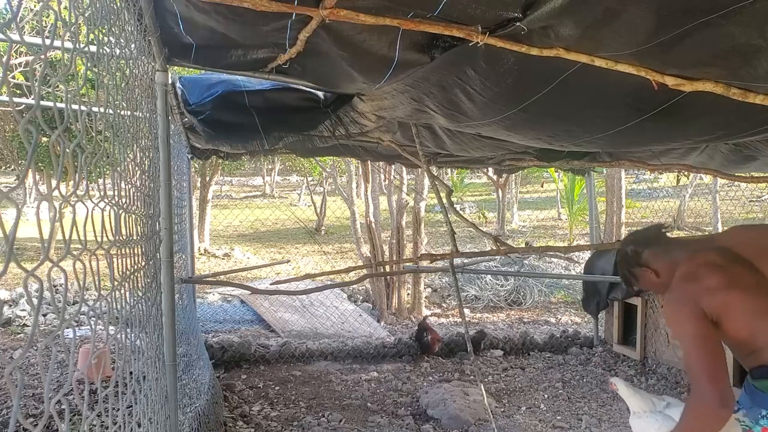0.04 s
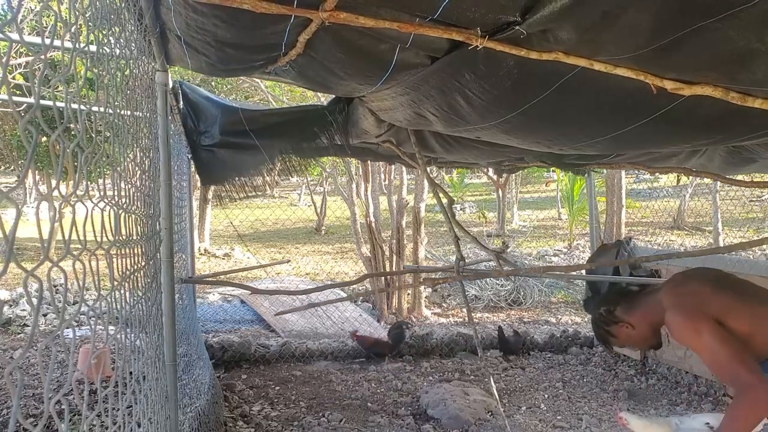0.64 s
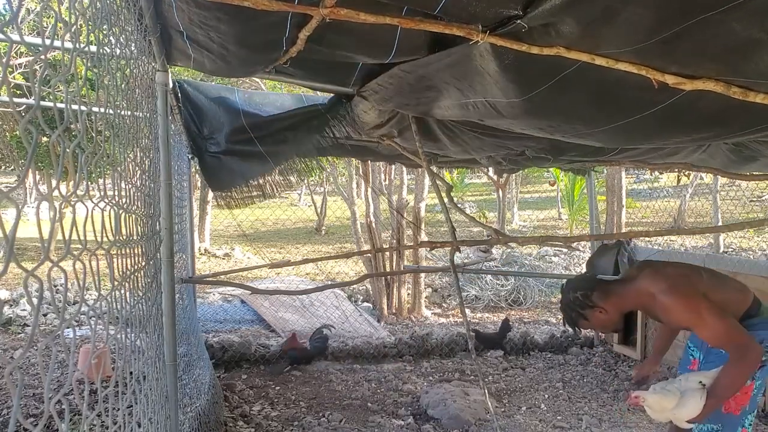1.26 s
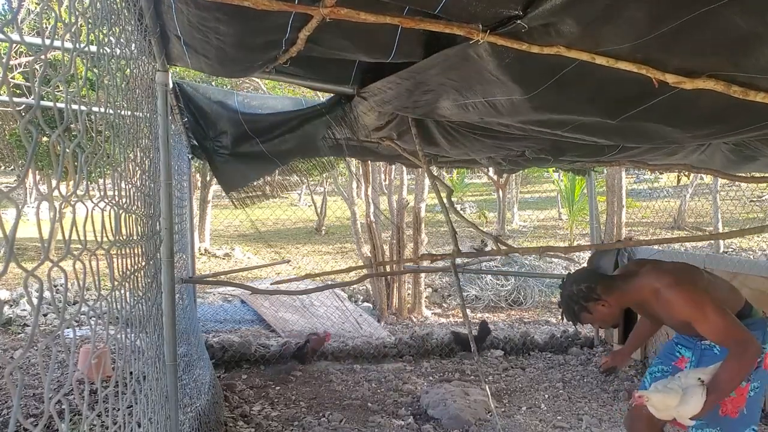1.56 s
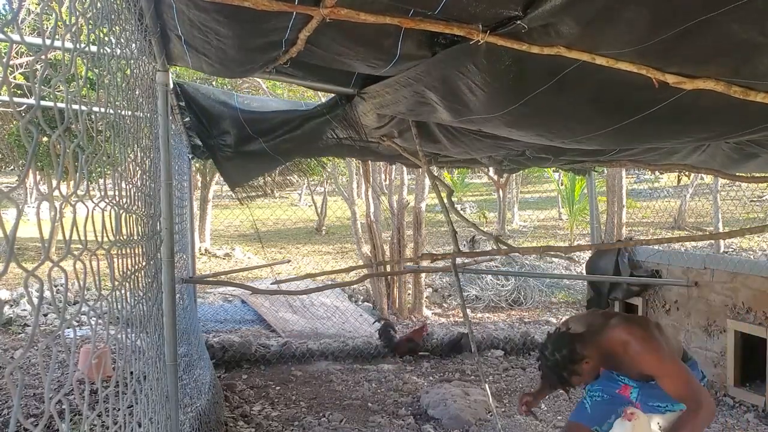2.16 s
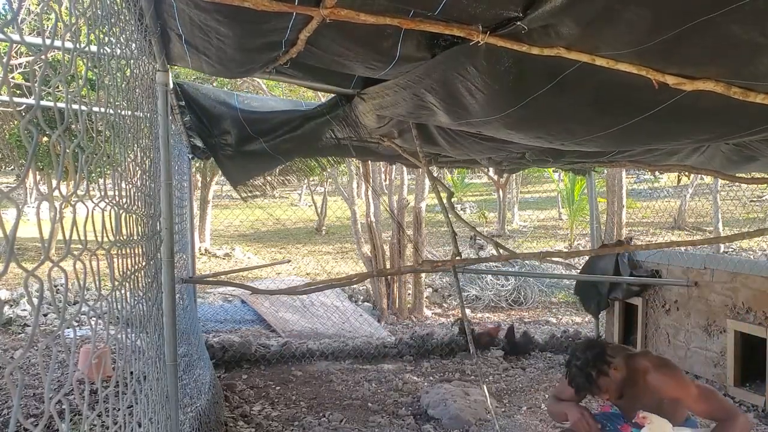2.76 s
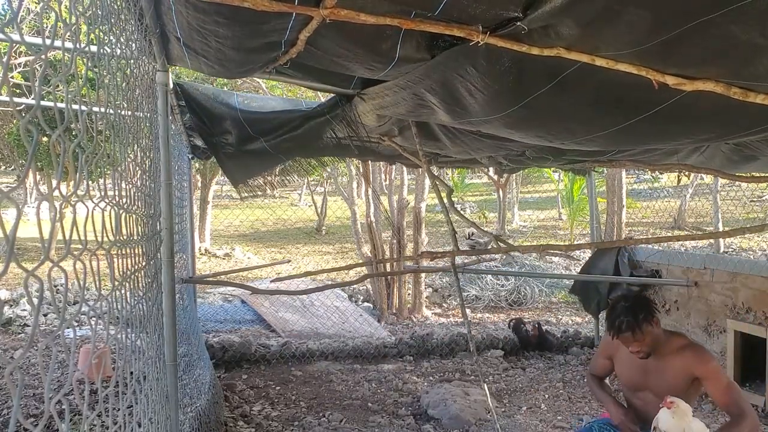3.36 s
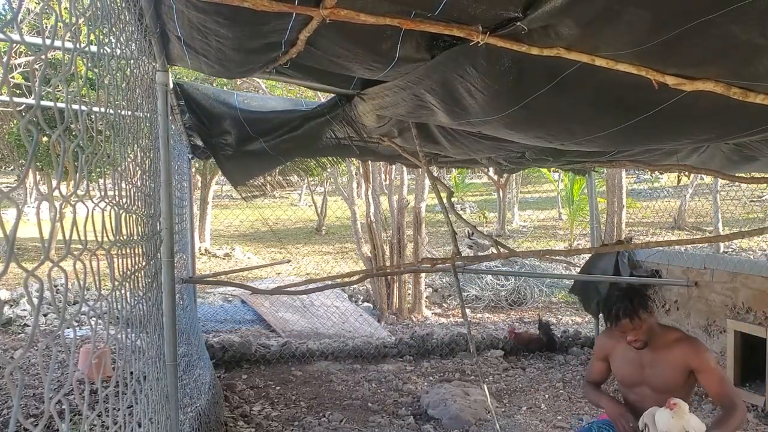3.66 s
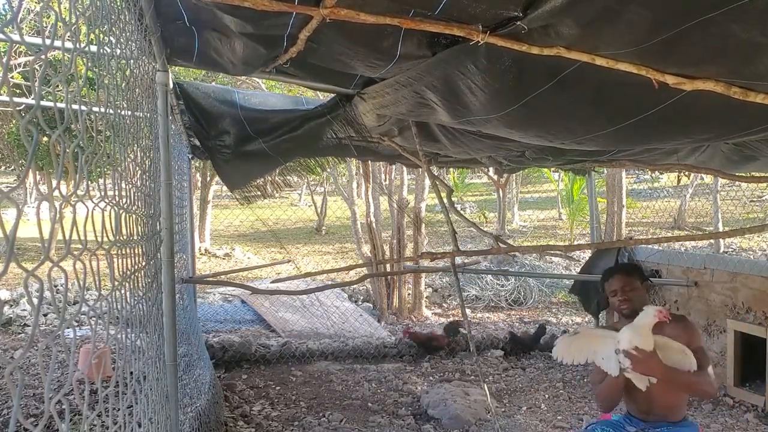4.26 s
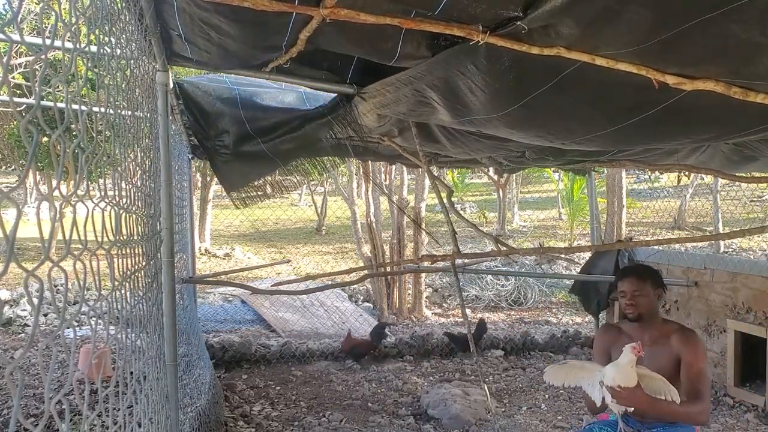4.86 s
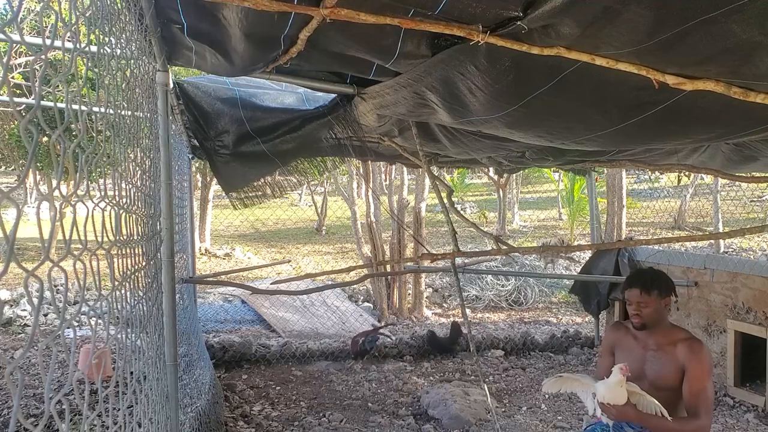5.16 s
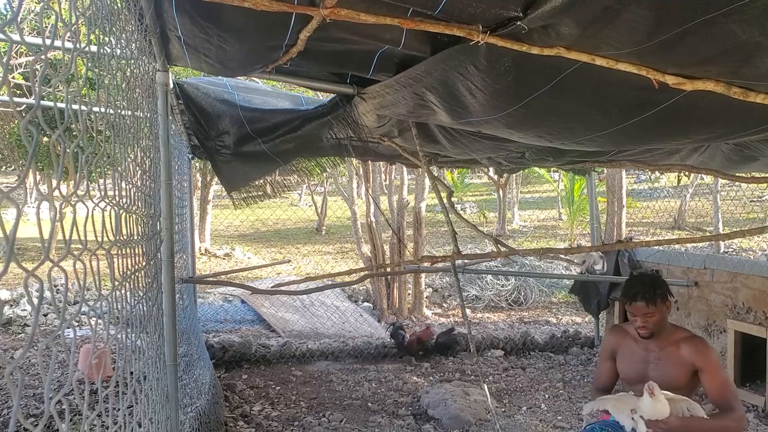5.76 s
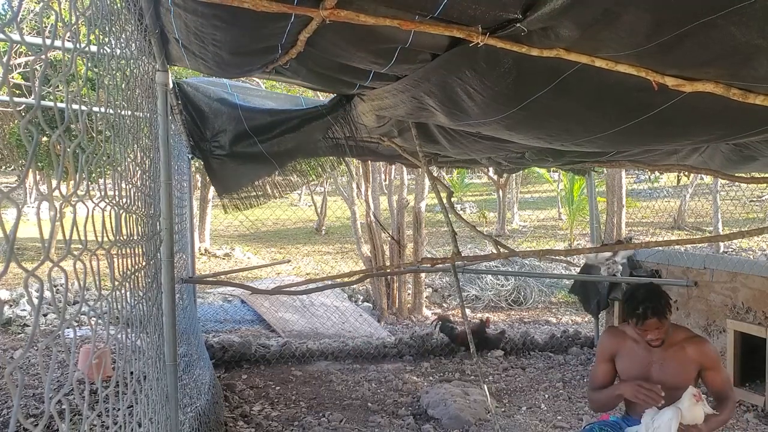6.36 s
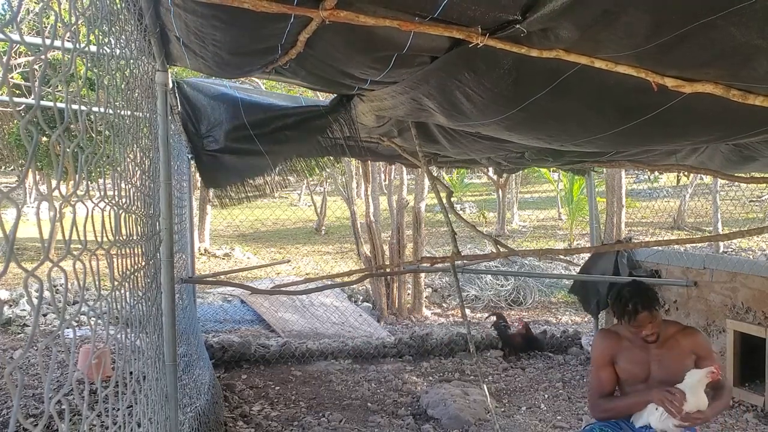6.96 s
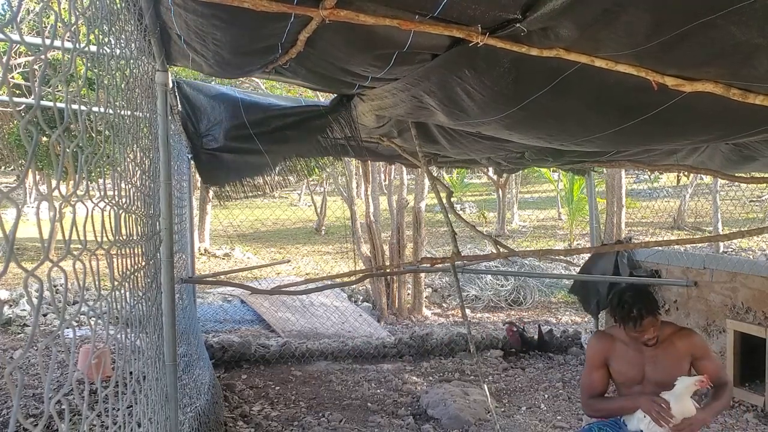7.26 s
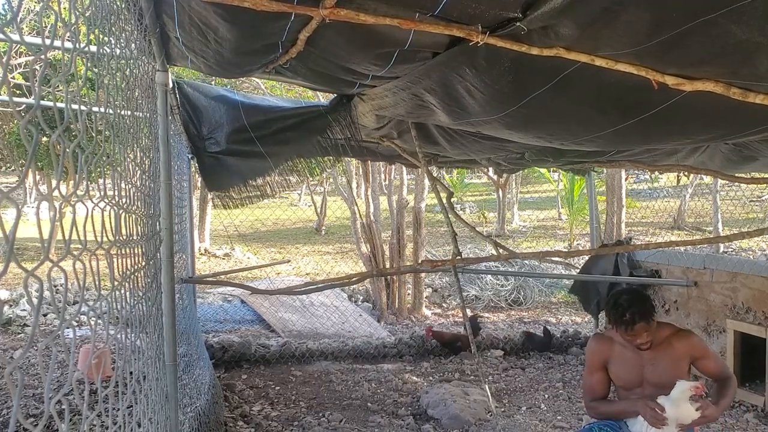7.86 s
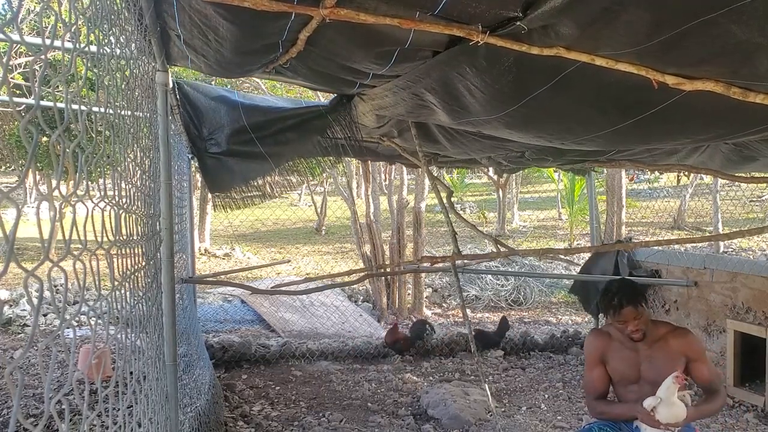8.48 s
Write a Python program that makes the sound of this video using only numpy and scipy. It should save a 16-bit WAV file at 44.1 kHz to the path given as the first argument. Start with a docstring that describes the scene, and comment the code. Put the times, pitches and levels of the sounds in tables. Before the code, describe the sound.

A hen squawks repeatedly in an outdoor pen, close to the microphone and slightly to the right. Most cries last about half a second, swelling from a rasp, sometimes clearing into a tone, then breaking into a lower croak. They come at about 0.3, 1.5, 2.9, 3.7, 4.4, 5.4, 6.5 and 7.3 seconds. Those at 3.7, 5.4 and 6.5 crack upward and are shriller, with 5.4 the loudest. Short hoarse clucks fall between them. At 8 seconds quick clucks lead into an abrupt high squawk and a softer, lower one.

Wind and handling rumble on the microphone during the first second, then stay low, with a few soft bumps from 4 seconds on. A distant rooster crows faintly from about 2 to 4.4 seconds. Scattered dry ticks of grit and feathers occur mostly in the first half. A quiet, steady rustle of leaves and open air continues throughout.

```python
"""A hen, held in the hand under a tarpaulin roof, squawks again and again, with short clucks in between.
Membranes in her syrinx chop the breath into pulses, which the resonances of throat and beak shape.
Each cry starts hoarse, may clear into a tone, and drops to a half-pitch croak by period doubling.
A rooster crows far off, grit and feathers tick, and the yard rustles. Handling and wind rumble on
a phone whose two microphone ports hear the hen from the right."""
import sys
import numpy as np
from scipy import signal
from scipy.fft import rfft, irfft, next_fast_len
from scipy.io import wavfile
from scipy.ndimage import uniform_filter1d

SR = 44100
rng = np.random.default_rng(int(sys.argv[2]) if len(sys.argv) > 2 else 0)


def store_wav(level_fs):
    """Save 16-bit WAV to argv[1]."""
    pcm = np.round(np.clip(np.atleast_2d(level_fs), -1, 1) * 32767)
    wavfile.write(sys.argv[1], SR, pcm.T.astype(np.int16))


N = 380141
TIME = np.arange(N) / SR
TOP_HZ = 15850


def undb(db):
    """Decibels to amplitude ratio."""
    return 10 ** (np.asarray(db) / 20)


def unit(x):
    """Normalise to rms 1."""
    return x / np.sqrt(np.mean(x ** 2))


def steady(x, size=420):
    """Flatten the envelope: divide by the running rms."""
    return x / np.sqrt(np.abs(uniform_filter1d(x ** 2, size)) + 1e-12)


def filtered(x, response):
    """Linear filtering: multiply the spectrum by a function of frequency."""
    size = next_fast_len(x.shape[-1] + 2048)
    hz = np.arange(size // 2 + 1) * SR / size + 1e-3
    return irfft(rfft(x, size) * response(hz), size)[..., :x.shape[-1]]


def coloured(x, points):
    """Spectral shaping through (frequency_hz, gain_db) points, normalised to rms 1."""
    hz, db = np.transpose(points)
    return unit(filtered(x, lambda f: undb(np.interp(np.log(f), np.log(hz), db))))


def flutter(count, hz):
    """Low-pass noise of rms 1, rolling off above hz."""
    return unit(filtered(rng.standard_normal(count), lambda f: 1 / (1 + (f / hz) ** 2)))


def wobble(count, hz):
    """Random modulation: hz values a second, joined by straight lines."""
    return np.interp(np.arange(count) * hz / SR, np.arange(512), rng.standard_normal(512))


def curve(points, at):
    """Linear interpolation in a two-column table."""
    return np.interp(at, *np.transpose(points))


def add(track, start_s, x):
    """Superposition: mix x into the track with tapered ends."""
    i = int(start_s * SR)
    track[i:i + len(x)] += (x * signal.windows.tukey(len(x), .02))[:N - i]


def rumble(shared=0.48, gain_db=0.5, buffet_db=3):
    """Partly coherent noise: fingers and gusts buffet the phone, and each port feels a part alone."""
    # strength of handling and wind, hard at first: time_s, level_db
    strength = [(0, -50), (.19, -37), (.26, -37.5), (.48, -28.5), (.65, -42.5), (.76, -37.5), (.86, -57),
                (1.3, -65.5), (1.75, -53.5), (2.6, -62), (3.2, -53.5), (4.4, -58.5), (5.6, -54), (6.3, -61),
                (7.8, -52), (8.6, -54)]
    # spectrum of the shaking: frequency_hz, gain_db
    spectrum = [(12, -46), (20, -11), (54, -3), (70, 1), (122, -9), (156, -13.5), (268, -26), (400, -30.5),
                (520, -20.5), (880, -120)]
    shaking = coloured(shared * rng.standard_normal(N) + rng.standard_normal((2, N)), spectrum)
    balance_db = np.array([[-.5], [2.8]])
    return shaking * undb(curve(strength, TIME) + gain_db + buffet_db * wobble(N, hz=21.2) + balance_db)


def yard(level_db=-55):
    """A diffuse field of leaves and open air: coherent at the two ports in the bass, not in the treble."""
    # spectrum of the background: frequency_hz, gain_db
    spectrum = [(88, -58), (150, -2.5), (186, -7), (269, -3), (474, -3), (522, -2.5), (974, -11.5),
                (2170, -14), (2340, -11.5), (3020, -10.5), (3390, -15), (11800, -15), (15800, -17)]
    common = filtered(rng.standard_normal(N), lambda f: 2 / (1 + (f / 1200) ** 2) ** .5)
    apart = filtered(rng.standard_normal((2, N)), lambda f: 2 / (1 + (900 / f) ** 2) ** .5)
    sway_db = .7 * flutter(N, hz=3)
    balance_db = np.array([[-.8], [.8]])
    return coloured(common + apart, spectrum) * undb(level_db + sway_db + balance_db)


def ticks(gain_db=-4, attack_s=.001, decay_s=.007):
    """Broadband transients: grit and stiff feathers give a dry crack with a little body."""
    # small impacts: start_s, level_db, body_db
    impacts = [(0.074, -37, -3), (1.1543, -44, -8), (1.2495, -41.5, -10), (2.0615, -36, 2),
               (2.4036, -39, -17), (2.643, -56, -13), (3.3298, -42, -2), (3.4462, -35, 0),
               (3.592, -42, -26), (3.675, -34, -9), (4.4816, -36, 0), (7.3305, -40.5, -16)]
    out, t = np.zeros(N), TIME[:4000]
    envelope = np.exp(-t / decay_s) * np.minimum(t / attack_s, 1)
    for start_s, level_db, body_db in impacts:
        noise = rng.standard_normal((2, len(t)))
        crack = coloured(noise[0], [(2000, 18), (6000, 5), (12000, 18.5), (16000, 2)])
        body = coloured(noise[1], [(200, 34), (900, -15), (3500, -13), (7000, -16)])
        add(out, start_s, undb(level_db + gain_db) * (crack + undb(body_db - 11) * body) * envelope)
    return out


def hoarseness(t, length_s, clear_s, break_s, tone_rough, tone_alternation, croak_rough):
    """Vibration regimes of a cry: irregular onset, periodic tone, then a period-doubled croak."""
    onset_rough, hoarse_rough, end_rough, croak_alternation = 0.804, .47, .54, 0.97
    clearing_s, breaking_s = 0.031, 0.0074
    stages = [(0, onset_rough), (max(clear_s - clearing_s, 0), hoarse_rough), (clear_s, tone_rough)]
    croak = (1 + np.tanh(2 * (t - break_s) / breaking_s)) / 2
    progress = np.clip((t - break_s) / (length_s - break_s), 0, 1)
    fraying = croak_rough + (end_rough - croak_rough) * progress ** 2
    rough = (1 - croak) * curve(stages, t) + croak * fraying
    alternation = tone_alternation + (croak_alternation - tone_alternation) * croak
    return np.maximum(rough, 0), alternation, croak


def syrinx(hz, rough, alternation, jitter=0.96, shimmer=0.99, wander=0.01596, uneven_db=5, hiss=.18):
    """A pulse source: membranes slap shut once a cycle; strain adds jitter, shimmer and rushing air."""
    n = len(hz)
    cycle = 2 * np.pi * np.cumsum(hz * (1 + wander * (0.211 + rough) * flutter(n, hz=51.7))) / SR
    phase = cycle + jitter * rough ** 2.33 * flutter(n, hz=170)
    slaps = np.zeros(n)
    for k in range(1, 29):  # the upper harmonics lag, and each swells and fades by itself
        gain = undb(uneven_db * min(k / 7, 1) ** 2 * wobble(n, hz=16))
        slaps += gain * np.cos(k * phase - .12 * k * k) * (k * hz < TOP_HZ)
    half_pitch = 1.31 * alternation * np.cos(cycle / 2 + .5)  # strong and weak cycles take turns
    strength = 1 + half_pitch + shimmer * rough * flutter(n, hz=189)
    air = (1 + 0.68 * np.cos(phase)) * rng.standard_normal(n)
    return unit(slaps * strength) + rough ** 2 * air + hiss * np.gradient(air)


def resonance(x, hz, width_hz):
    """A damped resonator whose centre frequency may move."""
    turn = np.exp(2j * np.pi * np.cumsum(hz * np.ones(len(x))) / SR)
    pole = np.exp(-np.pi * width_hz / SR)
    return np.real(turn * signal.lfilter([1 - pole], [1, -pole], x / turn))


def vocal_tract(source, level_db, chest_db, edge_db, treble_db, beak_hz, upper_hz):
    """Source and filter: throat and beak impose formants, then four bands each take their own level."""
    # fixed throat resonances: centre_hz, nominal_width_hz, gain_db
    formants = [(283, 170, -13), (610, 340, -11.5), (1214, 375, 1.5), (1777, 284, 1), (2710, 528, 8),
                (3550, 564, 3), (4317, 400, 0), (5250, 890, -15.5), (6774, 660, -13), (8950, 1620, -15.5),
                (11890, 2000, -17.5), (16200, 500, -16)]
    throat = filtered(source, lambda f: sum(
        (-1) ** k * undb(db) / (1 + 1j * (f / hz - hz / f) * hz / (1.43 * width)) ** 2
        for k, (hz, width, db) in enumerate(formants)))
    beak = resonance(throat, beak_hz, width_hz=240)
    upper = resonance(throat, upper_hz, width_hz=690)
    voice = throat + 4 * beak + 5 * upper
    chest, body, edge, treble = (
        steady(filtered(voice, lambda f: 1 / (1 + (f / high_hz) ** 24) / (1 + (low_hz / f) ** 24)))
        for low_hz, high_hz in [(200, 920), (920, 2300), (2300, 4900), (4900, TOP_HZ)])
    return undb(level_db) * (undb(chest_db + 1.5) * chest + undb(2) * body
                             + undb(edge_db + 5) * edge + undb(treble_db + 2) * treble)


def squawks(crack_s=0.014, crack_rough=0.26, tremble_db=4):
    """Formant shift: the opening beak lifts its resonance and brightens each swelling, trembling cry."""
    # the hen's cries (clear_s, break_s and widest_s count from start_s; roughness and alternation 0-1):
    # start_s, length_s, clear_s, break_s, widest_s, level_db, swell_s, tone_rough, tone_alternation,
    # croak_rough, croak_db, chest_db, edge_db, treble_db, open_hz, upper_hz
    cries = [ (0.249, .56, .29, .46, 0.36, -27.5, 0.097, .2, .05, 0.62, -2.5, -12.5, -10.5, -20, 1650, 3460),
             (1.53, 0.49, 0.3, 0.43, 0.35, -29, 0.11, 0.52, 0.1, 0.54, 1, -12, -7.5, -15.5, 1460, 3550),
             (2.875, .36, 0.032, 0.059, 0.26, -31, 0.08, 0.54, 0.43, 0.54, -0.5, -8, -5, -15.5, 1310, 3750),
             (3.692, 0.49, 0.28, 0.36, 0.34, -28.5, 0.1, 0.08, 0, 0.27, 8, -10.5, 1, -5.5, 1790, 3730),
             (4.416, 0.32, 0.14, 0.27, 0.21, -35.5, 0.067, 0.11, 0, 0.75, 3, -6.5, -8, -12, 1200, 3800),
             (5.438, 0.6, 0.14, 0.44, 0.35, -24, 0.12, 0.06, 0.06, 0.33, -2.5, -14, -4, -10.5, 1820, 3440),
             (6.545, 0.4493, 0.207, 0.3, 0.22, -30, 0.067, 0.05, 0, 0.47, 5, -10.5, 1, -9, 1470, 3720),
             (7.285, 0.66, 0.31, 0.53, 0.44, -31.5, 0.089, 0.32, 0.19, 0.59, -0.5, -14.5, -6.5, -16.5, 1310, 4010),
             (8.205, 0.24, 0.09, 0.197, 0.081, -25.5, 0.0055, 0.17, 0.18, 0.68, 3.5, -13, 0, -9.5, 1950, 3120),
             (8.405, 0.2, .03, 0.057, 0.025, -36.5, 0.0044, 0.38, 0.36, 0.44, -1, -7.5, -6, -12, 1120, 3260)]
    # one pitch contour for each cry: time_s, pitch_hz
    contours = [
        [(.245, 450.5), (.42, 544), (.52, 580), (.65, 577), (.70, 596.4), (.81, 497.5)],
        [(1.53, 474.4), (1.62, 528), (1.7, 523), (1.78, 549.3), (1.91, 560.4), (1.975, 492.6), (2.025, 465)],
        [(2.88, 461.4), (3.0, 542.6), (3.1, 502), (3.16, 498), (3.235, 428)],
        [(3.7, 560.6), (3.86, 557.6), (3.905, 776.6), (3.94, 783), (4.0, 703), (4.04, 800), (4.085, 891),
         (4.14, 835), (4.195, 753)],
        [(4.42, 456.2), (4.51, 497.7), (4.6, 501.5), (4.665, 491), (4.74, 435)],
        [(5.44, 509), (5.54, 556.2), (5.7, 606.8), (5.77, 648.8), (5.845, 708), (5.945, 727), (5.97, 832),
         (6.01, 776), (6.06, 683)],
        [(6.55, 523), (6.62, 574.7), (6.67, 736), (6.73, 794), (6.795, 701), (6.86, 840), (6.91, 770),
         (6.93, 833), (6.995, 632.6)],
        [(7.29, 615.6), (7.4, 647), (7.52, 620.7), (7.6, 591.7), (7.68, 595.3), (7.74, 628), (7.81, 643),
         (7.88, 561), (7.94, 542)],
        [(8.2, 797), (8.235, 900), (8.29, 882), (8.32, 844), (8.35, 850), (8.385, 871), (8.41, 912)],
        [(8.41, 562.4), (8.46, 510), (8.49, 561.6), (8.6, 515)],
    ]
    # cracks of the voice between registers: time_s, surge_db, extra_edge_db
    cracks = [(0.501, 1.5, 5), (0.724, 3.5, 1), (3.958, 4.5, 4), (4.052, 8, -1), (5.645, 1, -0.5),
              (5.79, -0.5, 1), (5.852, -2.5, 8.5), (6.714, 5, -1), (7.402, 5.5, 2), (8.25, 1, 0),
              (8.288, 3.5, 0.5), (8.406, 3, 0.5)]
    attack_share, swell_db, release_s, release_db = 0.23, 22, 0.047, 31
    gape_s, shut_hz, closing_s, closing_sag = 0.13, 1285, 0.045, 0.16
    chest_follows = 0.69  # share of the swell that the chest takes part in
    out = np.zeros(N)
    for cry, contour in zip(cries, contours):
        (start_s, length_s, clear_s, break_s, widest_s, level_db, swell_s, tone_rough, tone_alternation,
         croak_rough, croak_db, chest_db, edge_db, treble_db, open_hz, upper_hz) = cry
        t = TIME[:int(length_s * SR)]
        rough, alternation, croak = hoarseness(
            t, length_s, clear_s, break_s, tone_rough, tone_alternation, croak_rough)
        release = np.clip(1 - (length_s - t) / release_s, 0, 1) ** 2
        effort_db = -swell_db * np.exp(-t / swell_s) - release_db * release
        gape = np.exp(-((t - widest_s) / gape_s) ** 2)
        closing = np.exp((t - length_s) / closing_s)
        beak_hz = (shut_hz + (open_hz - shut_hz) * gape) * (1 - closing_sag * closing)
        ring_db = croak_db * croak  # acts only on the body band, where the beak rings
        level_db += effort_db + ring_db + tremble_db * rough * wobble(len(t), hz=54.17)
        # the croak is thinner and duller than the tone
        chest_db -= (1 - chest_follows) * effort_db + 3 * croak + ring_db
        edge_db -= 5 * (1 - gape) + ring_db
        treble_db -= 3.5 * (1 - gape) + 2 * croak + ring_db
        for time_s, surge_db, extra_edge_db in cracks:
            crack = np.exp(-((start_s + t - time_s) / crack_s) ** 2)
            level_db += surge_db * crack
            edge_db += extra_edge_db * crack
            rough += crack_rough * crack
        source = syrinx(curve(contour, start_s + t), rough, alternation)
        voice = vocal_tract(source, level_db, chest_db, edge_db, treble_db, beak_hz, upper_hz)
        add(out, start_s, voice * np.minimum(t / (attack_share * swell_s), 1))
    return out


def clucks(width_s=0.017, arch=.15, opening=0.13, glide=0.0696, gain_db=-1.2):
    """Frequency modulation: pitch and formant of each short, hoarse note arch as the beak opens and shuts."""
    # notes between the cries: peak_s, level_db, edge_db, beak_hz, pitch_hz
    notes = [(0.929, -39, -4.5, 1420, 487), (1.495, -45.5, -10, 1320, 432), (2.209, -45.5, -8.5, 1130, 420),
             (2.444, -31, -13, 1460, 459), (3.667, -46.5, -11, 1130, 411), (5.097, -49, -9, 1280, 435),
             (5.293, -36.5, -7, 1350, 456), (6.215, -36.5, -10, 1150, 491), (6.405, -37, -11, 1150, 476.4),
             (7.213, -43.5, -7.5, 1450, 453), (8.009, -27.5, -7, 1500, 520),
             (8.124, -34.5, -4, 1200, 439.6)]
    out, t = np.zeros(N), np.arange(-1800, 2600) / SR
    swell = 1 / (1 + (t / width_s) ** 4)
    lift = 1 + glide * np.tanh(t / width_s)
    for peak_s, level_db, edge_db, beak_hz, pitch_hz in notes:
        source = syrinx(pitch_hz * lift * (1 + arch * (swell - 1)), rough=0.45, alternation=0.37)
        chest_db = -47 - level_db  # the chest sounds equally in every cluck
        voice = vocal_tract(source, level_db + gain_db, chest_db, edge_db, treble_db=edge_db - 12,
                            beak_hz=beak_hz * lift * (1 + opening * (swell - 1)), upper_hz=3470)
        add(out, peak_s + t[0], swell * voice)
    return out


def rooster(scoop=.11, scoop_s=0.077, fade_db=19):
    """Treble loss over distance: the low harmonics carry, as each note scoops upward and fades."""
    # notes of the crow: start_s, length_s, pitch_hz, level_db
    notes = [(1.979, 0.17, 787, -53), (2.462, 0.13, 715, -61.5), (3.232, 0.26, 781, -56),
             (4.14, 0.21, 850, -64)]
    out = np.zeros(N)
    for start_s, length_s, pitch_hz, level_db in notes:
        t = TIME[:int(length_s * SR)]
        source = syrinx(pitch_hz * (1 - scoop * np.exp(-t / scoop_s)), rough=0.58, alternation=0.15)
        voice = coloured(source, [(400, 6), (780, -0.5), (1600, -1.5), (2300, -6), (3500, -15), (7000, -18)])
        add(out, start_s, undb(level_db + 2 - fade_db * (t / length_s) ** 2) * voice)
    return out


def bumps(ring_s=0.0065):
    """Damped oscillation: a soft knock rocks the phone for a cycle or two."""
    # fingers shifting on the phone: start_s, level_db, ring_hz
    knocks = [(4.085, -40.5, 66), (4.848, -36.5, 79.8), (5.128, -36.5, 73), (6.737, -42, 153),
              (7.747, -40.5, 81), (8.595, -38, 75)]
    out, t = np.zeros(N), TIME[:5000]
    envelope = (t / ring_s) * np.exp(1 - t / ring_s)
    for start_s, level_db, ring_hz in knocks:
        add(out, start_s, undb(level_db) * envelope * np.sin(2 * np.pi * ring_hz * t))
    return out


def reflection(x, delay_s, drift_s=0.0002593, step_s=.01):
    """A varying delay: the reflected path changes as the bird and the phone move."""
    steps = np.arange(0, TIME[-1] + 1, step_s)
    drift = np.interp(TIME, steps, flutter(len(steps), hz=.6 * SR * step_s))
    return np.interp(TIME - delay_s - drift_s * drift, TIME, x, left=0)


def pen(x, aside, wet_db, t60_s=0.3, reflection_db=-12):
    """Shadowing and reflection: the left port is shaded; ground and wall answer, then roof and trees."""
    # excess level at the right port: frequency_hz, difference_db
    shading = [(300, 3), (1500, 2.5), (2800, 1.5), (4200, 5.5), (6500, 5.5), (9000, 0.5), (12000, 5.5),
               (15000, 9)]
    # phase of the left port against the right, for sound from aside: frequency_hz, phase_rad
    port_phase = [(0, 0.5), (1460, -1.5), (2000, -2), (2900, -2.5), (4390, -5), (6290, -4.5), (8100, -5),
                  (8960, -7.5), (10300, -10), (15400, -12.5)]
    shadow = lambda f: undb(curve(shading, f) / 2)
    left = filtered(x, lambda f: np.exp(1j * aside * curve(port_phase, f)) / shadow(f))
    right = filtered(x, shadow)
    early = np.array([port + undb(reflection_db) * sum(reflection(port, s) for s in delays_s)
                      for port, delays_s in [(left, (.0021, .0054, .0113)), (right, (.0029, .0047, .0098))]])
    t = TIME[:22050]
    tail = coloured(rng.standard_normal((2, len(t))), [(200, 0), (1500, 14), (4000, 13.5), (14000, 0)])
    tail *= undb(-60 * t / t60_s) * (t > .008)
    tail /= np.sqrt(np.sum(tail[0] ** 2))
    return early + undb(wet_db) * signal.fftconvolve(x[None], tail, axes=1)[:, :N]


def scene():
    """Superposition of the hen close by on the right, the reverberant rooster, handling and the yard."""
    near = pen(squawks() + clucks() + ticks(), aside=1, wet_db=-24)
    far = pen(rooster(), aside=0, wet_db=0)
    return near + far + rumble() + bumps() + yard()


def record(dry, ceiling=.8):
    """Soft limiting: the loudest squawks are rounded off, and the top treble is cut."""
    rounded = ceiling * np.tanh(dry / ceiling)
    return signal.sosfilt(signal.ellip(10, .2, 70, TOP_HZ, fs=SR, output="sos"), rounded)


dry = scene()
out = record(dry)
store_wav(out)
```